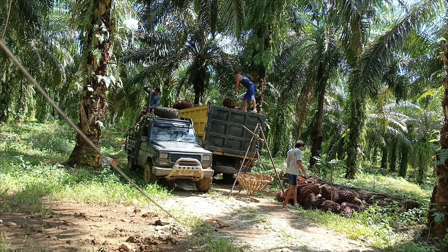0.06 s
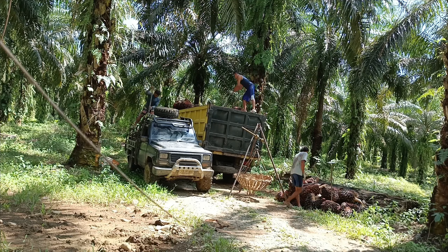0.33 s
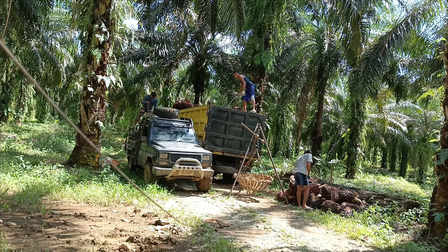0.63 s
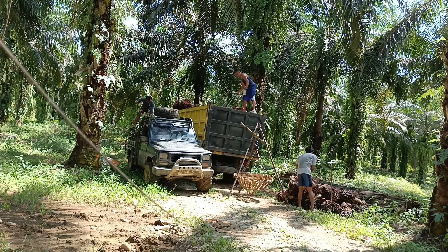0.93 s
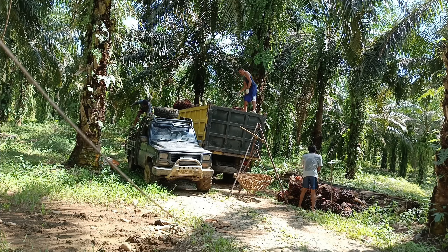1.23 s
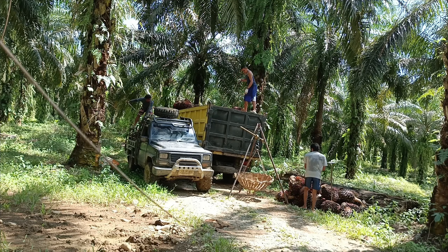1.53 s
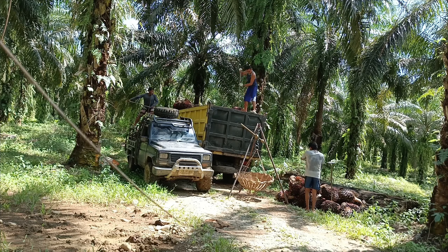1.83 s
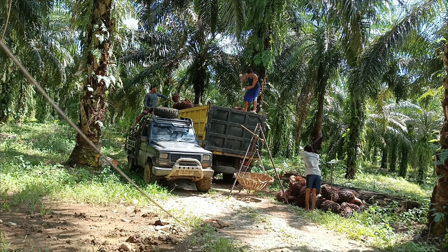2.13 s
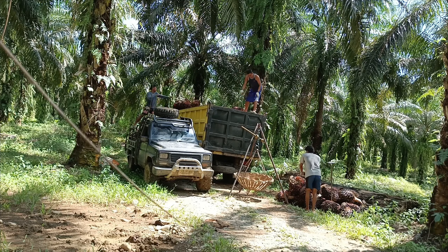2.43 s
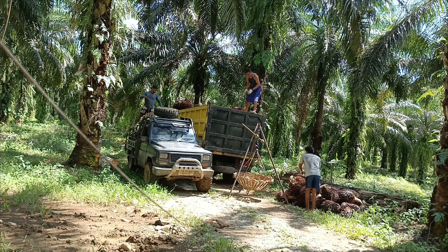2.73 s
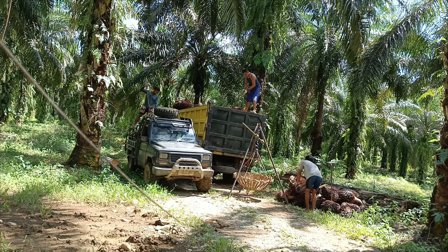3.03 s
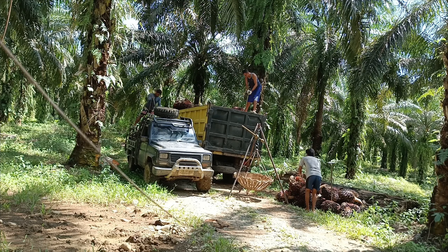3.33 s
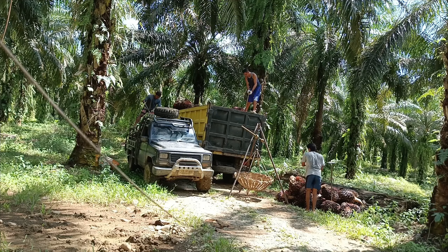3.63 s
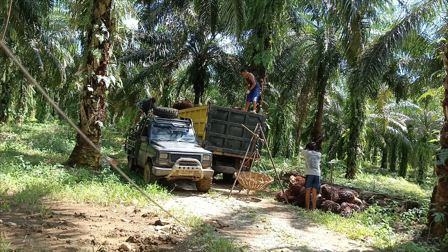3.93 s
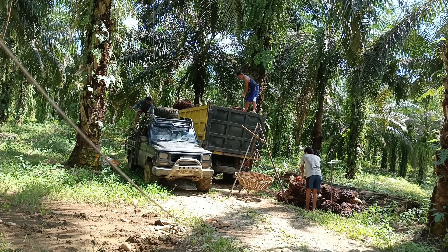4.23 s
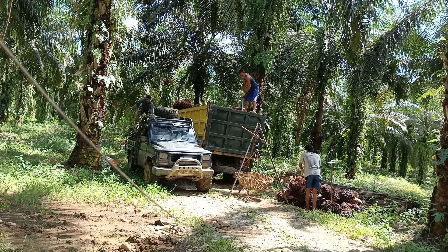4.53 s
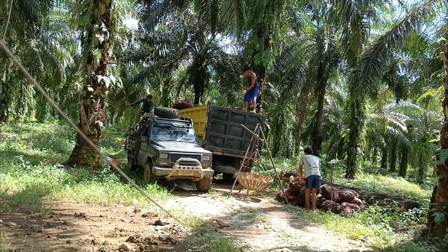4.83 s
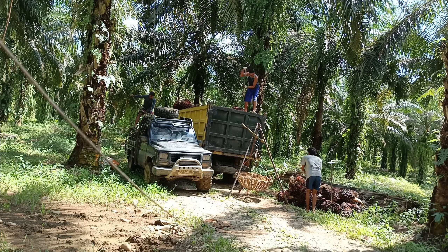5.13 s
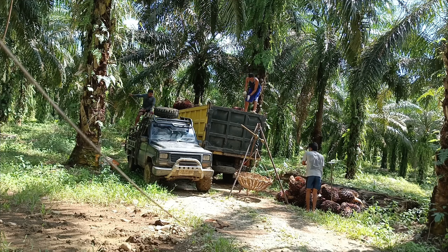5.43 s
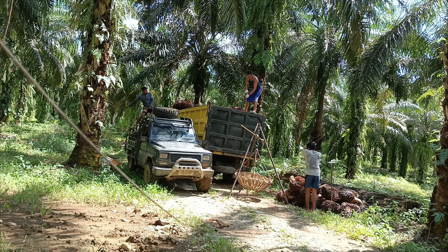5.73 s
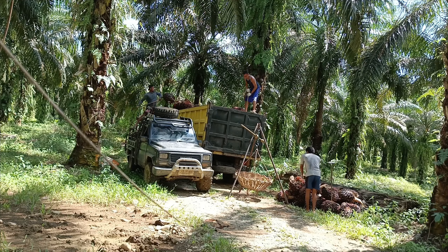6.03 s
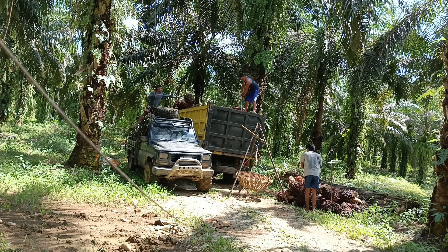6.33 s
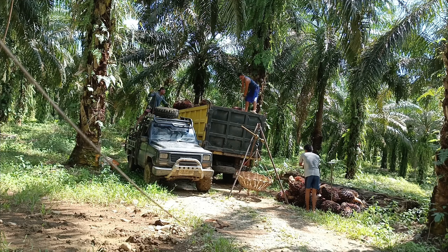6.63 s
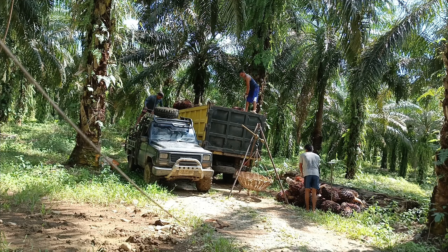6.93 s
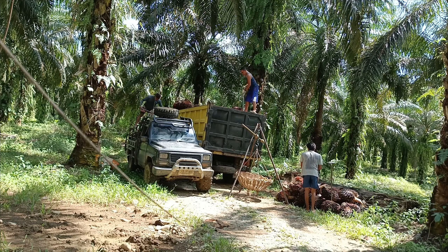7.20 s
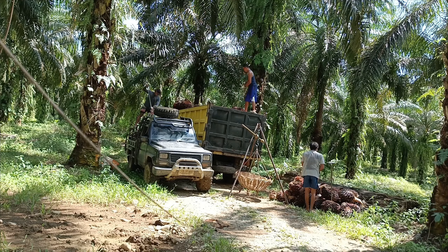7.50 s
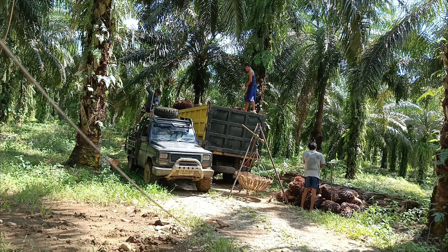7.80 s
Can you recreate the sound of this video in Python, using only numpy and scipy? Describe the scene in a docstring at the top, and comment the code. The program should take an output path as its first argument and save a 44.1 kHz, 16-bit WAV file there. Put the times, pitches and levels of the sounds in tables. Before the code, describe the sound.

Cicadas buzz thinly while spiky palm fruit bunches land on a metal truck bed with thuds, knocks and rustles.

```python
"""Loading palm fruit

Some way off in a plantation, heavy bunches are flung onto a truck's steel bed. Each lands with a
crack of spikes, a fleshy thud and a dying rustle, then bunches tumble, knock and scrape on the load.
The bed booms, stalks snap, dry fronds stir and the truck squeaks once. Cicadas drone in the palms
throughout, with a far cricket and faint air behind them."""
import sys
import numpy as np
from scipy import signal
from scipy.fft import rfft, irfft, next_fast_len
from scipy.io import wavfile
from scipy.ndimage import map_coordinates

SR = 44100
rng = np.random.default_rng(int(sys.argv[2]) if len(sys.argv) > 2 else 0)


def generate_wav(signal):
    """Clip the signal to [-1, 1] and save it as 16-bit WAV at the path in sys.argv[1]."""
    frames = np.transpose(np.atleast_2d(signal))
    scaled = np.clip(frames, -1, 1) * 32767
    pcm = np.round(scaled).astype(np.int16)
    wavfile.write(sys.argv[1], SR, pcm)


N = 355446
HIT_SIZE = 32768  # samples in one hit
T = np.arange(HIT_SIZE) / SR
NOW = np.arange(N) / SR

# slow swell of the cicada chorus: time_s, level_db
CHORUS_SWELL = [(0, -62), (1.2, -63.5), (2.8, -60), (4.3, -65.5), (4.7, -61), (6.8, -64.5), (7.25, -61),
                (8.06, -62.5)]
# the drone's level ducks briefly, as under a noise suppressor: time_s, depth_db, fall_s, recovery_s
DRONE_DUCKS = [(.51, 7, .08, 0.088), (0.819, 44, 0.048, .075), (2.454, 17, .015, .02),
               (3.255, 16, 0.088, 0.16), (3.78, 22, 0.009, .045), (4.985, 11, 0.024, 0.11),
               (5.62, 16.5, 0.064, 0.044), (6.22, 7.5, 0.023, .03), (7.67, 21.5, 0.017, 0.047),
               (7.96, 10, .025, 0.034)]
# main band of the chorus: freq_hz, level_db
CHORUS_EQ = [(6000, -50), (6350, -30), (6700, -9.5), (7100, -4), (7400, -2.5), (7750, -11.5), (8250, -29),
             (8500, -19.5), (8750, -32), (11500, -49)]
# its top octave: freq_hz, level_db
SIZZLE_EQ = [(11500, -32), (13200, -22), (14400, -0.5), (15100, -2), (15600, -9.5)]
# the cricket sings louder: start_s, length_s, level_db
CRICKET_TRILLS = [(1.25, 0.059, -77), (1.78, 0.19, -76)]
# open air: freq_hz, level_db
AIR_EQ = [(20, -17), (50, -10), (110, -0.5), (300, -6.5), (1000, -10), (2500, -14.5), (5100, -18.5),
          (9500, -18), (11000, -27), (12500, -29.5), (15000, -24)]
# dull knocks of bunch on bunch and on the side boards: start_s, level_db, pitch_hz, t60_s
BUNCH_KNOCKS = [(0.124, -67, 477, 0.2), (0.4, -61, 289, 0.74), (2.654, -34.5, 537, 0.15),
                (2.74, -44.5, 594, 0.13), (3.007, -29.5, 640, 0.23), (3.034, -29, 481, 0.25),
                (3.687, -40, 1020, 0.11), (4.094, -64, 299, 0.31), (4.856, -59.5, 566, 0.062),
                (4.942, -41.5, 825, 0.055), (5.53, -53, 398, 0.089), (5.935, -39, 639, 0.19),
                (6.027, -30, 770, 0.095), (6.049, -38.5, 482, 0.46), (6.199, -46.5, 604, 0.26),
                (6.32, -43, 285, 0.2), (6.5, -25.5, 925, 0.24), (6.529, -35, 716, 0.28),
                (6.557, -28.5, 670, 0.13), (6.643, -30, 665, 0.27), (6.752, -33, 800, 0.13),
                (6.829, -38, 650, 0.11), (6.99, -31.5, 385, 0.35), (7.117, -36, 838, 0.23),
                (7.315, -28, 881, 0.19), (7.333, -34.5, 451, 0.21), (7.615, -54, 455, 0.45)]
# resonances of the steel bed: centre_hz, width_hz, lift_db
BED_MODES = [(380, 36, 7.5), (519.7, 19, 8), (693, 110, 7), (1047, 50, 6), (1295, 270, 4.5),
             (1710, 18, 3.5), (2110, 76, 3.5), (2420, 290, 4.5), (3110, 40, 6), (3360, 36, 5),
             (3880, 100, 1), (5700, 210, 6)]
# bunches land: start_s, crack_db, crack_hz, thud_db, thud_length_s, thud_tilt_db_per_octave,
# panel_db, panel_hz, clang_hz, rustle_db, rustle_decay_s
LANDINGS = [(0.533, -66, 1400, -40, 0.027, -9.5, -38, 357, 577, -55.5, 0.26),
            (0.624, -32, 7580, -26.5, 0.0067, -1, -31, 580, 1060, -39.5, 0.21),
            (2.472, -15.5, 2164, -24.5, 0.025, -1, -24, 401, 1080, -30.5, 0.42),
            (3.527, -31, 6300, -39, 0.034, -1, -35, 476, 1126, -35, 0.27),
            (4.433, -16, 3400, -30, 0.024, 0.6, -23, 326, 1675, -31, 0.39),
            (6.241, -23.5, 3810, -31, .019, -0.5, -22, 281, 680, -36.5, 0.38),
            (6.583, -40, 3360, -37.5, 0.027, 1.5, -28.5, 383, 766, -50, .5),
            (6.999, -30.5, 3240, -32.5, 0.027, -1, -27, 573, 1800, -42, 0.486),
            (7.607, -53, 2424, -59, 0.0404, 9.5, -43, 246, 1150, -62, 0.29),
            (7.882, -76.5, 2050, -50, 0.042, -6, -48, 374, 800, -62, 0.31)]
# spikes breaking: freq_hz, level_db
CRACK_EQ = [(100, -26), (400, -11.5), (1000, -9.5), (2300, -9.5), (3800, -1.5), (4400, -9), (5200, -13),
            (6300, -4), (8000, -20.5), (9500, -8), (11500, -21.5), (13500, -8), (15500, -22.5)]
# flesh hitting steel: freq_hz, level_db
THUD_EQ = [(25, -36.5), (60, -25), (150, -2.5), (330, -3), (480, -5), (750, -10), (1050, -6), (1500, -10.5),
           (2300, -7.5), (3800, -16.5), (5000, -21.5), (6500, -21), (11000, -34), (15000, -34.5)]
# fibres and loose fruit: freq_hz, level_db
RUSTLE_EQ = [(40, -25), (150, -7.5), (400, 3.5), (750, 1.5), (1200, -2), (2000, -1.5), (2600, -6.5),
             (3700, -4), (5000, -8), (6500, -7.5), (9000, -12), (12000, -18.5), (15000, -15)]
# how long each band of the rustle lasts: freq_hz, decay_ratio
RUSTLE_DECAY = [(100, .7), (500, 0.66), (2000, 0.87), (4000, 1.21), (8000, 0.97), (15000, 1.3)]
# a bunch rolls over on the load: start_s, length_s, rumble_db, crunch_db
BUNCH_ROLLS = [(0.541, 0.14, -41.5, -53), (2.49, 0.037, -41.5, -59.5), (2.551, .1, -56.5, -45.5),
               (2.682, 0.049, -58.5, -62), (5.94, 0.12, -55.5, -74), (6.066, 0.19, -68, -73),
               (6.256, 0.11, -47.5, -55), (6.359, 0.1, -41.5, -50), (6.501, 0.17, -39.5, -62.5),
               (6.712, 0.29, -49, -65), (6.985, 0.082, -47.5, -50.5), (7.191, 0.22, -53, -68.5)]
# weight of a roll: freq_hz, level_db
RUMBLE_EQ = [(25, -28.5), (60, -9.5), (130, 8), (250, 6), (450, 1), (750, 0.5), (1200, -5), (1800, -31),
             (3000, -39), (8000, -67)]
# spikes crushed in a roll: freq_hz, level_db
CRUNCH_EQ = [(400, -20.5), (1200, -2.5), (2200, -1.5), (3500, -8), (5000, -10.5), (8000, -18), (15000, -33)]
# the bed booms under shifting weight: start_s, level_db, pitch_hz, t60_s
BED_BOOMS = [(0.546, -34, 150, 0.25), (0.555, -43, 62, 0.41), (0.597, -42.5, 209.4, 0.43),
             (0.698, -32, 214, 0.08), (0.79, -60, 158, 0.34), (0.855, -55.5, 168, .14),
             (1.21, -68, 85, .25), (1.879, -66.5, 206, 0.12), (2.433, -42, 141, 0.18),
             (2.475, -23, 250, .06), (2.675, -40.5, 90.5, 0.29), (2.717, -46, 113, 0.29),
             (2.788, -49.5, 115, 0.13), (3.007, -42.5, 163.5, 0.22), (3.539, -48, 130.5, 0.51),
             (3.774, -56.5, 140.7, 0.37), (3.829, -55, 193, 0.24), (5.524, -33.5, 166.6, 0.17),
             (5.53, -56, 60.3, .35), (6.335, -32, 164, 0.15), (6.588, -29, 251, 0.21),
             (6.615, -20.5, 154, 0.11), (6.648, -25, 112, 0.19), (6.72, -36.5, 115, 0.3),
             (6.93, -48.5, 139, 0.6), (7.221, -41.5, 174, 0.17), (7.612, -42, 159.6, 0.18),
             (7.886, -43.5, 196, 0.17)]
# stalks and spikes snap: start_s, level_db, pitch_hz, t60_s
STALK_SNAPS = [(1.071, -60.5, 2213, 0.14), (1.805, -71.5, 2030, 0.071), (2.4107, -35.5, 2713, 0.011),
               (2.7013, -36.5, 4000, 0.037), (4.184, -53.5, 3520, 0.037), (4.2333, -56, 6000, 0.066),
               (4.353, -58.5, 2670, 0.033), (4.943, -38, 2460, 0.02), (4.954, -50, 2330, 0.04),
               (5.5015, -30.5, 3600, 0.024), (5.511, -43, 2470, 0.034), (5.8673, -42.5, 2990, 0.015),
               (6.3855, -32, 2255, 0.16), (6.4094, -34, 2050, 0.12), (7.207, -51, 2220, 0.056),
               (7.321, -54, 1750, 0.12), (7.537, -56, 10540, 0.019), (7.786, -58, 10050, 0.023),
               (7.837, -55.5, 3770, 0.038)]
# fibres splitting: freq_hz, level_db
SPLIT_EQ = [(2000, -16), (6000, -1), (9500, 1), (13000, -6), (15000, -6.5)]
# a bunch drags over steel: start_s, length_s, groan_db, rasp_db
BUNCH_DRAGS = [(2.876, 0.325, -55.5, -55.5), (3.422, .1, -59, -58.5)]
# stick-slip rate, following the sliding speed: time_s, rate_hz
SLIP_CURVE = [(2.88, 504), (2.99, 778), (3.05, 683), (3.10, 520), (3.15, 427), (3.53, 595)]
# partials of the groan: harmonic, level_db
GROAN_PARTIALS = [(1, 3), (2, -3), (3, -2), (4, -11), (5, -46)]
# friction noise of a drag: freq_hz, level_db
RASP_EQ = [(150, -21), (500, 7), (1200, -6.5), (2200, 3), (3900, -5), (4800, -12), (8000, -15.5),
           (15000, -29.5)]
# arc of the truck's squeak: time_s, pitch_hz, level_db
SQUEAK_CURVE = [(3.302, 854, -91.5), (3.312, 896, -66), (3.34, 920, -66), (3.375, 908.7, -66),
                (3.42, 830, -76)]
# partials of the squeak: harmonic, level_db
SQUEAK_PARTIALS = [(1, -5), (2, -7.5), (3, -14), (4, -20)]
# spikes skid over bare steel and stop dead: start_s, length_s, level_db
SPIKE_SKIDS = [(3.525, .237, -43.5), (7.215, .205, -62)]
# scratch of a skid: freq_hz, level_db
SKID_EQ = [(200, -21.5), (900, 7), (3000, -2), (7000, 2), (11500, -7.5), (14000, -10), (15500, -12)]
# high notes of scratched steel: centre_hz, width_hz, lift_db
SKID_MODES = [(2770, 70, 11), (3400, 89, 12), (4260, 55, 3), (5600, 110, 17.5), (6930, 110, 13.5),
              (8300, 70, 3.5), (9800, 560, 6)]
# dry fronds stir: start_s, length_s, level_db
FROND_STIRS = [(4.093, 0.33, -72.5), (5.293, .11, -72.5)]
# dry leaflets: freq_hz, level_db
FROND_EQ = [(500, -32), (2600, -1), (6000, -1), (10000, 1), (15000, -8)]

# envelopes: attack_s, sag_db_per_s, release_db_per_s
TRILL_SHAPE, ROLL_SHAPE, DRAG_SHAPE = (0.13, 0, 500), (0.015, 7.7, 314), (0.049, 5, 690)
SKID_SHAPE, STIR_SHAPE = (0.015, 77, 1800), (0.05, 15, 300)

SIZZLE_DB, PULSE_HZ, PULSE_DB = -10, 8.7, 3  # sizzle against the main band; its pulse rate and depth
CRICKET_DB = -94  # faint song between trills
CLANG_DB, CLANG_WIDTH_RATIO = 8.5, 0.21  # resonance of the struck spot
SWAY_DB, SWAY_DB_PER_OCTAVE, SWAY_T60_S = -25, -10, 0.63  # level is against a boom at 150 Hz
SPLIT_DB, SPLIT_T60_S = -20, 0.049  # level is against the snap
GROAN_DB_PER_OCTAVE, RASP_DB_PER_OCTAVE = 20, 3.5  # faster sliding is louder
TOP_HZ = 15550


def amp(db):
    """Decibels to gain."""
    return 10 ** (np.asarray(db) / 20)


def unit(x):
    """x at rms 1."""
    return x / np.sqrt(np.mean(x ** 2) + 1e-20)


def along(points, hz):
    """A curve of (freq_hz, value) points, read on a log axis."""
    freqs, values = np.transpose(points)
    return np.interp(np.log(hz + 1), np.log(freqs + 1), values)


def lift(modes, hz):
    """The boost in dB that a set of resonances gives each frequency."""
    return sum(db / (1 + (2 * (hz - centre) / width) ** 2) for centre, width, db in modes)


def hump(centre_hz, octaves, slope_db):
    """A bell EQ with a round top and skirts that fall slope_db per octave."""
    return lambda hz: -slope_db * (np.hypot(np.log2((hz + 1) / centre_hz), octaves) - octaves)


def spot(depth_db):
    """A random EQ ripple: each spot of contact favours its own frequencies."""
    knots = rng.standard_normal(120)
    return lambda hz: depth_db * map_coordinates(knots, [14 * np.log2(1 + hz / 300)], mode="nearest")


def curves(rows):
    """One automation curve for each column after the time."""
    times, *columns = np.transpose(rows)
    return [np.interp(NOW, times, column) for column in columns]


def wobble(rate, size=N):
    """A smooth random curve, rate knots a second."""
    knots = rng.standard_normal(int(size * rate / SR) + 4)
    return map_coordinates(knots, [np.arange(size) * rate / SR])


def noise(eq, size=N, grain_db=0):
    """Noise of rms 1 through an EQ; grain_db clumps it into tiny contacts."""
    x = rng.standard_normal(size)
    if grain_db:
        x = x * amp(grain_db * wobble(700, size))
    padded = next_fast_len(size)
    spectrum = rfft(x, padded) * amp(eq(np.fft.rfftfreq(padded, 1 / SR)))
    return unit(irfft(spectrum, padded)[:size])


def burst(eq, envelope, ripple_db=11.5):
    """A short coloured noise that carries just the energy of its envelope."""
    ripple = spot(ripple_db)
    x = noise(lambda hz: eq(hz) + ripple(hz), size=HIT_SIZE) * envelope
    return x * np.linalg.norm(envelope) / np.linalg.norm(x)


def fade(t60):
    """A decay that loses 60 dB in t60 seconds."""
    return np.exp(-np.log(1000) * T / np.maximum(t60, 1e-3))


def rise(seconds):
    """A soft attack."""
    return 1 - np.exp(-T / seconds)


def add(track, start, x):
    """Mix x into the track from start seconds."""
    part = track[round(start * SR):][:len(x)]
    part += x[:len(part)]


def strokes(rows, shape, layer=0):
    """Attack, sagging hold and release for each row; layer picks among its level columns."""
    attack_s, sag, release = shape
    out = np.zeros(N)
    for start, length, *levels_db in rows:
        attack = np.minimum(T / attack_s, 1)
        level_db = levels_db[layer] - sag * T - release * np.maximum(T - length, 0)
        add(out, start, attack * amp(level_db))
    return out


def cicadas():
    """Many insects merge into one narrow fluttering band, with a pulsing sizzle an octave up."""
    swell_db, = curves(CHORUS_SWELL)
    flutter_db = 0.7 * wobble(35) + 1.1 * wobble(400)
    duck_db = sum(depth * np.exp(-np.abs(NOW - time) / np.where(NOW > time, recovery, fall))
                  for time, depth, fall, recovery in DRONE_DUCKS)
    pulse_db = PULSE_DB * np.sin(2 * np.pi * PULSE_HZ * NOW + 2.2 * wobble(5))
    sizzle = amp(SIZZLE_DB + pulse_db) * noise(lambda hz: along([(8000, -80)] + SIZZLE_EQ, hz))
    drone = noise(lambda hz: along(CHORUS_EQ, hz))
    return amp(swell_db + 1.1 + flutter_db - duck_db) * (drone + sizzle)


def cricket():
    """A far bush cricket trills on one narrow band."""
    band = noise(hump(4660, octaves=0.01, slope_db=225))
    flutter = amp(3 * wobble(19) + 3 * wobble(120))
    return unit(band * flutter) * (amp(CRICKET_DB) + strokes(CRICKET_TRILLS, TRILL_SHAPE))


def air():
    """A faint, almost steady wash of open air."""
    return amp(-83.5) * noise(lambda hz: along(AIR_EQ, hz)) * amp(0.37 * wobble(5))


def knocks():
    """Soft contacts give a brief clack and ring one hollow note in the bed's midrange."""
    out = np.zeros(N)
    for start, db, pitch, t60 in BUNCH_KNOCKS:
        hollow = hump(pitch, octaves=0.84, slope_db=42.5)
        body = burst(lambda hz: hollow(hz) + lift(BED_MODES, hz), fade(t60) * rise(0.0059), ripple_db=4)
        clack = burst(hump(1.19 * pitch, octaves=0.67, slope_db=33), fade(0.4 * t60) * rise(0.0024))
        note = np.sin(2 * np.pi * pitch * T) * fade(0.5 * t60) * rise(0.00026)
        add(out, start, amp(db - 8) * body + amp(db - 15.5) * clack + amp(db - 6) * note)
    return out


def landings():
    """Spikes crack first, then the mass squashes against the bed and flexes one of its panels."""
    out = np.zeros(N)
    # spikes break ever faster until the mass arrives
    crush = np.exp(-np.abs(T - 0.0035) / 0.0022) * rise(0.0008)
    for (start, crack_db, crack_hz, thud_db, thud_s, tilt_db,
         panel_db, panel_hz, clang_hz, rustle_db, rustle_s) in LANDINGS:
        stalk = [(crack_hz, 0.3 * crack_hz, 8)]
        panel = [(panel_hz, 0.27 * panel_hz, 5)]
        clang = [(clang_hz, CLANG_WIDTH_RATIO * clang_hz, CLANG_DB)]
        softness_db = -0.15 * (crack_db + 19.5)  # gentler blows lose their top octave
        crack_eq = lambda hz: along(CRACK_EQ, hz) + lift(stalk + clang, hz) - softness_db * hz / 10000
        crack = burst(crack_eq, crush, ripple_db=2.5)
        squash = rise(0.003) * np.exp(-(T / thud_s) ** 6)
        thud_eq = lambda hz: (along(THUD_EQ, hz) + lift(BED_MODES + panel + clang, hz)
                              + 0.6 * lift(stalk, hz) + tilt_db * np.log2(1 + hz / 200))
        thud = burst(thud_eq, squash, ripple_db=2.5)
        bend = np.exp(-np.abs(T - 0.65 * thud_s) / 0.0018) * rise(0.0022)
        flex = np.sin(2 * np.pi * panel_hz * T) * bend
        impact = amp(crack_db - 2.5) * crack + amp(thud_db) * thud + amp(panel_db - 1.5) * flex
        add(out, start, impact + amp(rustle_db) * rustle(rustle_s, crack_hz))
    return out


def rustle(decay_s, pitch_hz):
    """Fibres and loose fruit rattle on the bed, whose resonances stretch the tail."""
    stalk = [(pitch_hz, 0.22 * pitch_hz, 3)]
    eq = lambda hz: along(RUSTLE_EQ, hz) + 0.36 * lift(BED_MODES, hz) + lift(stalk, hz)
    freqs, times, bands = signal.stft(noise(eq, size=HIT_SIZE, grain_db=2), SR, nperseg=1024)
    stretch = amp(0.28 * lift(BED_MODES, freqs) + spot(1.2)(freqs) + 0.31)
    band_t60 = np.maximum(decay_s * along(RUSTLE_DECAY, freqs) * stretch, 0.01)
    decay = np.exp(-np.log(1000) * times / band_t60[:, None])
    _, tail = signal.istft(bands * decay, SR, nperseg=1024)
    return tail[:HIT_SIZE] * rise(0.0067) * amp(0.57 * wobble(120, size=HIT_SIZE))


def tumbling():
    """Rolling bunches rumble on the bed and crunch their spikes."""
    rumble = noise(lambda hz: along(RUMBLE_EQ, hz) + lift(BED_MODES, hz), grain_db=2.5)
    rumble *= strokes(BUNCH_ROLLS, ROLL_SHAPE) * amp(1.5 * wobble(60) - 3)
    crunch = noise(lambda hz: along(CRUNCH_EQ, hz) + lift(BED_MODES, hz), grain_db=2)
    crunch *= strokes(BUNCH_ROLLS, ROLL_SHAPE, layer=1)
    return rumble + crunch


def booms():
    """The floor of the bed swings under shifting weight: a deep note and a low puff."""
    out = np.zeros(N)
    for start, db, pitch, t60 in BED_BOOMS:
        swing = np.sin(2 * np.pi * pitch * T) * fade(0.64 * t60) * rise(0.0098)
        puff = burst(hump(pitch, octaves=0.45, slope_db=25), fade(t60) * rise(0.0042), ripple_db=5.5)
        add(out, start, amp(db - 0.5) * swing + amp(db - 7.5) * puff)
    return out


def swaying():
    """Every boom of the bed rocks the truck on its frame, the deep ones most."""
    power = np.zeros(N)
    for start, db, pitch, _ in BED_BOOMS:
        gain = amp(db + SWAY_DB + SWAY_DB_PER_OCTAVE * np.log2(pitch / 150))
        add(power, start, (gain * fade(SWAY_T60_S) * rise(0.0062)) ** 2)
    low_end = hump(100, octaves=0.9, slope_db=26)
    return np.sqrt(power) * noise(lambda hz: low_end(hz) + lift([(115, 12, 4.6)], hz))


def snaps():
    """Dry stalks break with a pitched woody tick, which the palms scatter faintly."""
    out = np.zeros(N)
    scatter = amp(-10.5) * fade(0.081)
    for start, db, pitch, t60 in STALK_SNAPS:
        tick = (fade(t60) + scatter) * rise(0.0017)
        splinter = burst(hump(pitch, octaves=0.49, slope_db=42), tick, ripple_db=0.5)
        phase = 2 * np.pi * pitch * T + 0.36 * wobble(130, size=HIT_SIZE)
        clink = np.sin(phase) * fade(1.3 * t60) * rise(0.00027)
        split = burst(lambda hz: along(SPLIT_EQ, hz), fade(SPLIT_T60_S))
        add(out, start, amp(db - 10) * splinter + amp(db - 6) * clink + amp(db + SPLIT_DB) * split)
    return out


def dragging():
    """Uneven stick and slip gives a rasp and a hoarse groan whose pitch rides the sliding speed."""
    slip_hz, = curves(SLIP_CURVE)
    octaves = np.log2(slip_hz / SLIP_CURVE[0][1])
    groan_gain = strokes(BUNCH_DRAGS, DRAG_SHAPE) * amp(GROAN_DB_PER_OCTAVE * octaves)
    rasp_gain = strokes(BUNCH_DRAGS, DRAG_SHAPE, layer=1) * amp(RASP_DB_PER_OCTAVE * octaves)
    slips = np.cumsum(slip_hz * (1 + 0.0589 * wobble(400))) / SR
    groan = np.zeros(N)
    for harmonic, db in GROAN_PARTIALS:
        flutter = 0.24 + wobble(190) + 1j * wobble(190)  # each partial swells and drifts on its own
        groan += amp(db) * np.real(flutter * np.exp(2j * np.pi * harmonic * slips))
    rasp = noise(lambda hz: along(RASP_EQ, hz), grain_db=3)
    return groan_gain * unit(groan) + rasp_gain * rasp


def squeak():
    """One thin, wavering squeak, as of the truck's springs."""
    pitch, level_db = curves(SQUEAK_CURVE)
    cycles = np.cumsum(pitch * (1 + 0.0115 * wobble(400))) / SR
    tone = sum(amp(db) * np.sin(2 * np.pi * harmonic * cycles) for harmonic, db in SQUEAK_PARTIALS)
    gate = (NOW > SQUEAK_CURVE[0][0]) & (NOW < SQUEAK_CURVE[-1][0])
    return unit(tone) * amp(level_db + 2.3 * wobble(160)) * gate


def skidding():
    """Spikes scratch the steel and keep its high notes ringing."""
    scratch = noise(lambda hz: along(SKID_EQ, hz) + lift(SKID_MODES, hz), grain_db=1)
    return scratch * strokes(SPIKE_SKIDS, SKID_SHAPE)


def fronds():
    """Dry leaflets crackle in small clumps, each frond with its own faint notes."""
    out = np.zeros(N)
    for stir in FROND_STIRS:
        notes = spot(5)
        crackle = noise(lambda hz: along(FROND_EQ, hz) + notes(hz), grain_db=3.5)
        clumps = amp(3.1 * wobble(49))
        out += unit(crackle * clumps) * strokes([stir], STIR_SHAPE)
    return out


def scene():
    """Faint air, loading work and insects, all panned centre."""
    ambience = air()
    hits = landings() + knocks() + booms() + swaying() + snaps()
    movement = tumbling() + skidding() + dragging() + squeak() + fronds()
    mono = ambience + hits + movement + cicadas() + cricket()
    return np.array([mono, mono])


def record(dry):
    """A brick-wall high cut at TOP_HZ on the whole mix."""
    padded = next_fast_len(N + HIT_SIZE)
    passband = np.fft.rfftfreq(padded, 1 / SR) < TOP_HZ
    return irfft(rfft(dry, padded) * passband, padded)[:, :N]


dry = scene()
out = record(dry)
generate_wav(out)
```